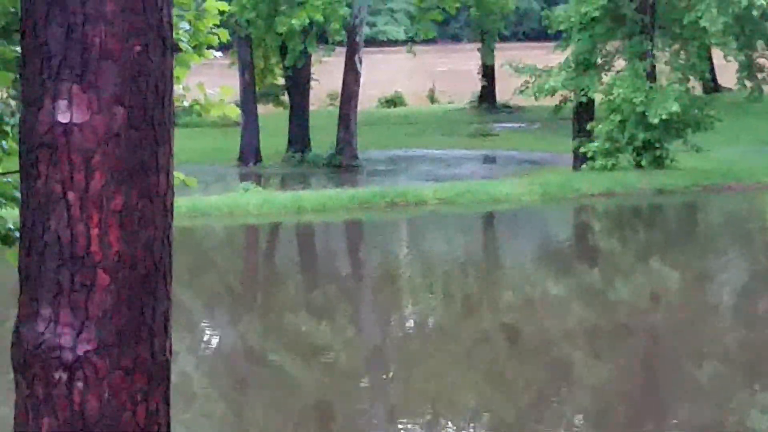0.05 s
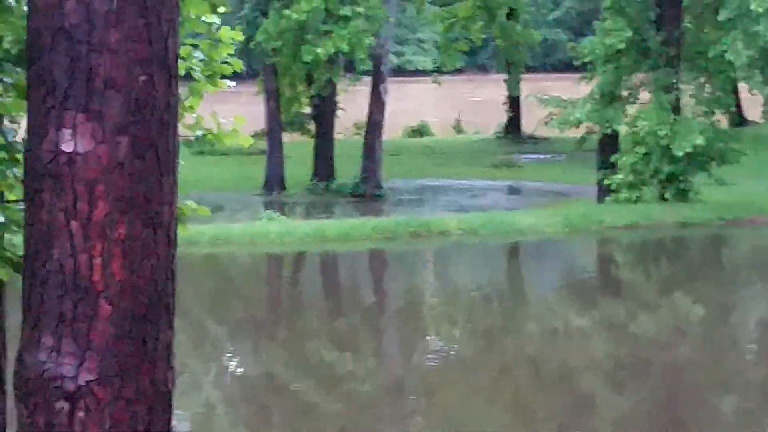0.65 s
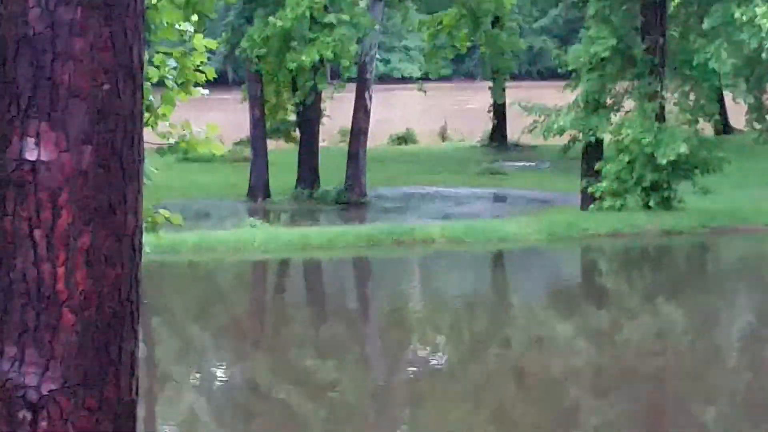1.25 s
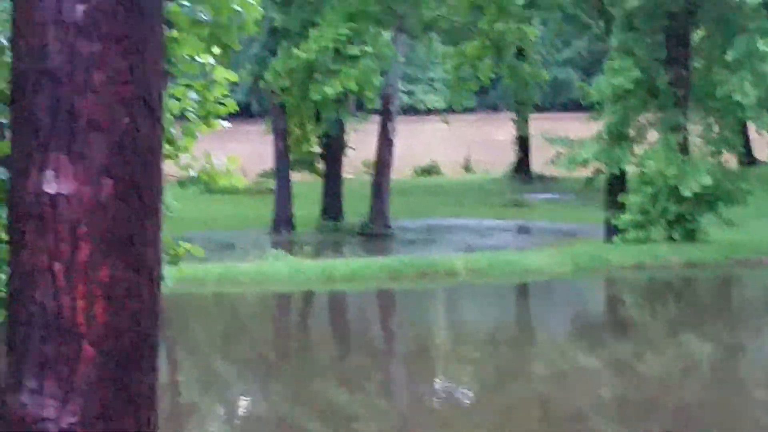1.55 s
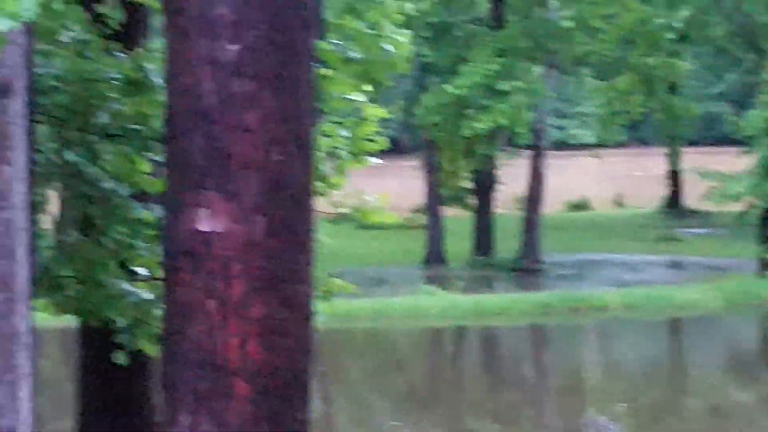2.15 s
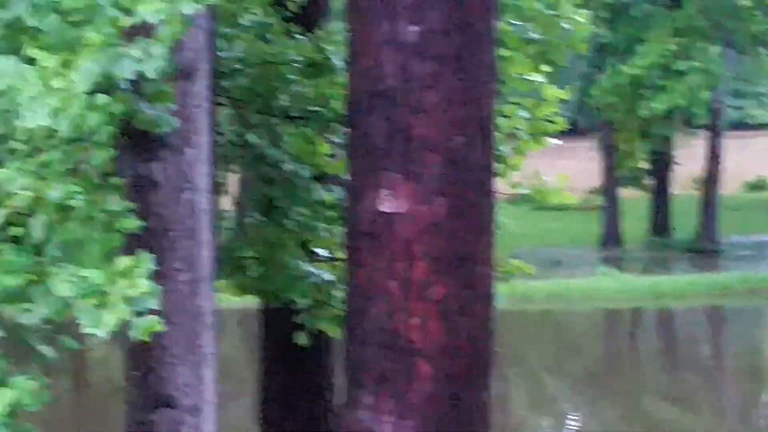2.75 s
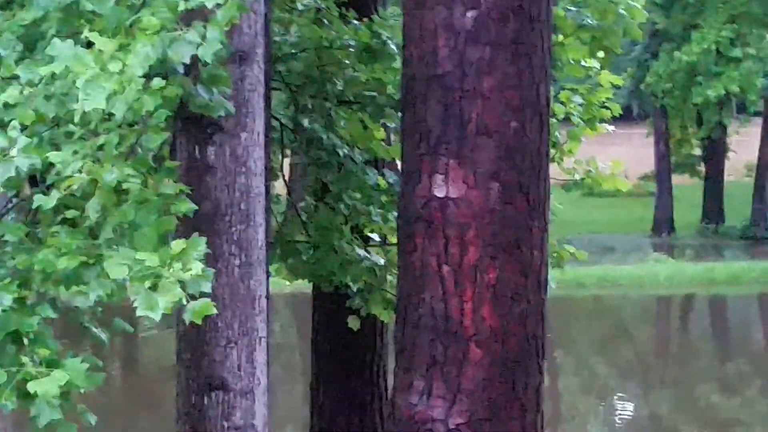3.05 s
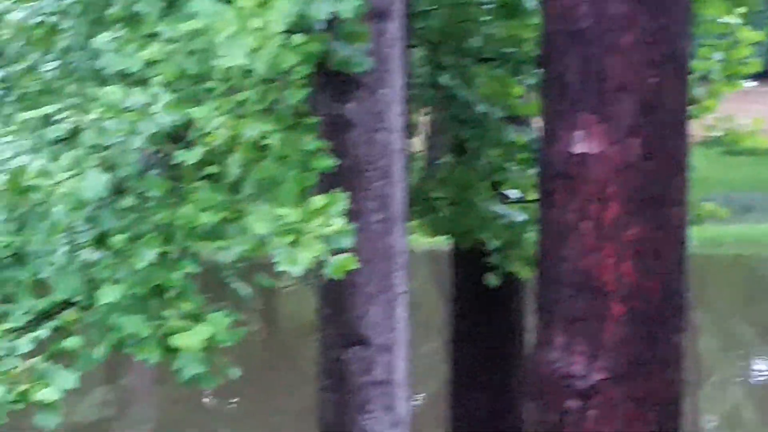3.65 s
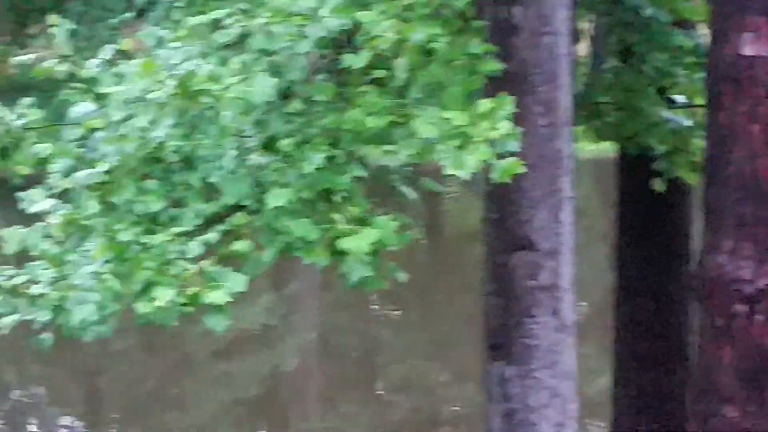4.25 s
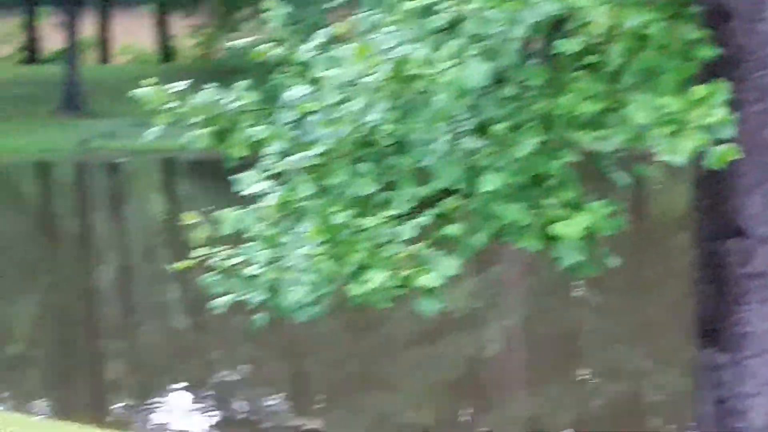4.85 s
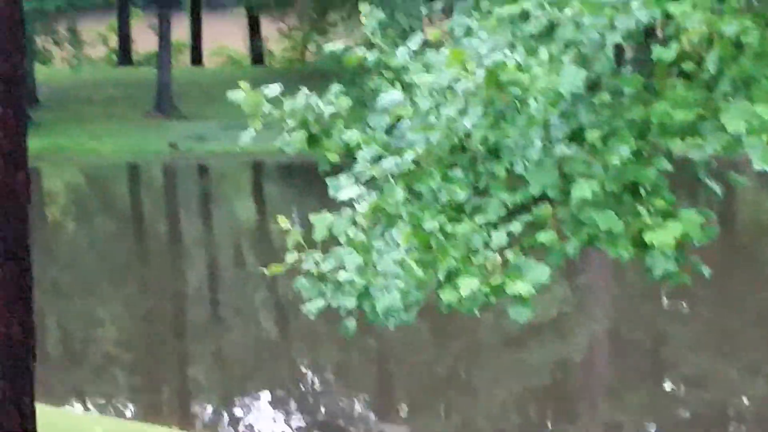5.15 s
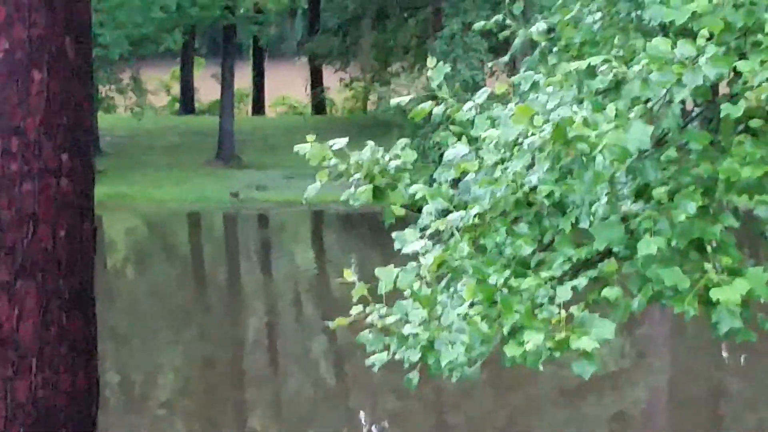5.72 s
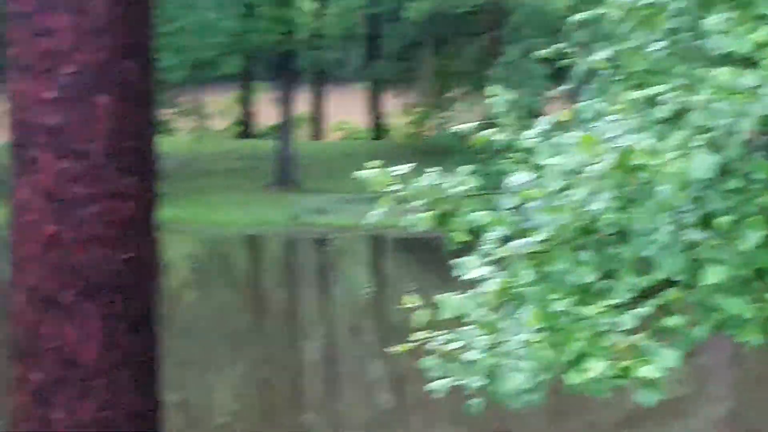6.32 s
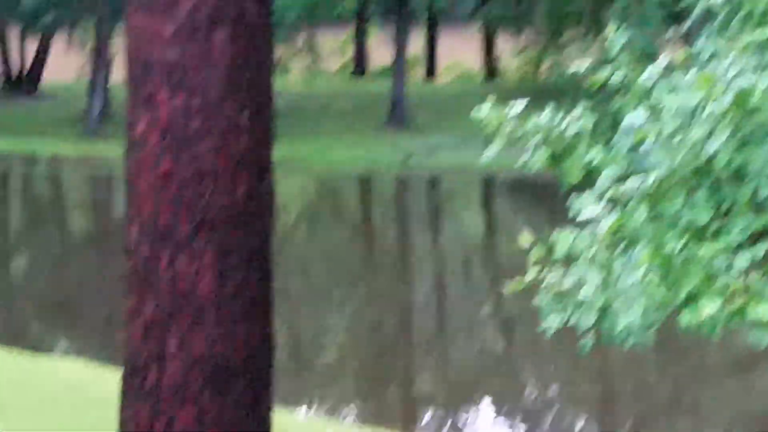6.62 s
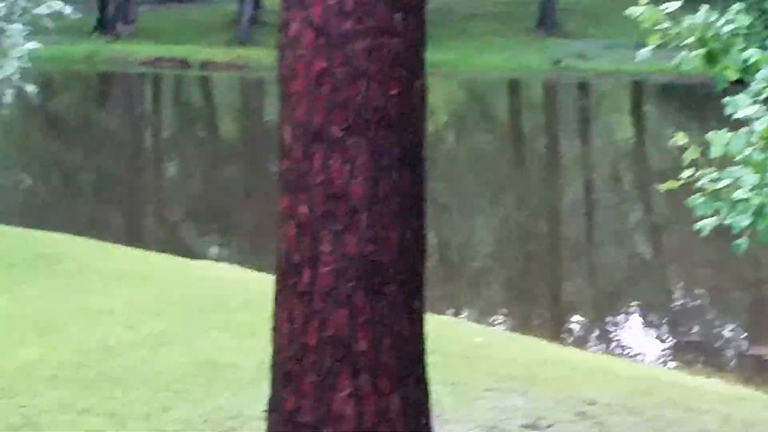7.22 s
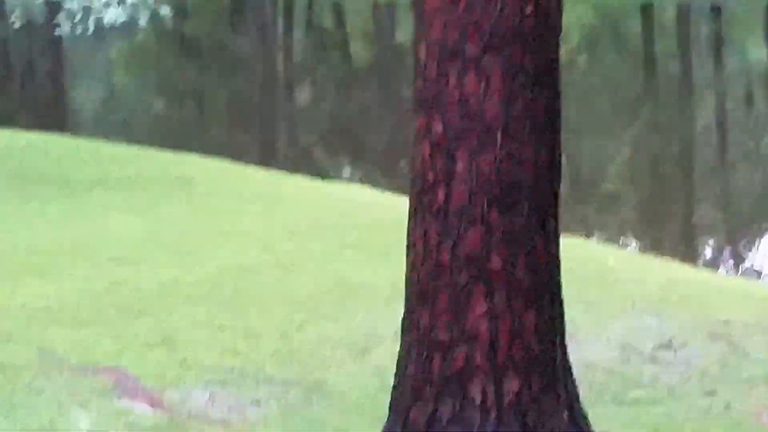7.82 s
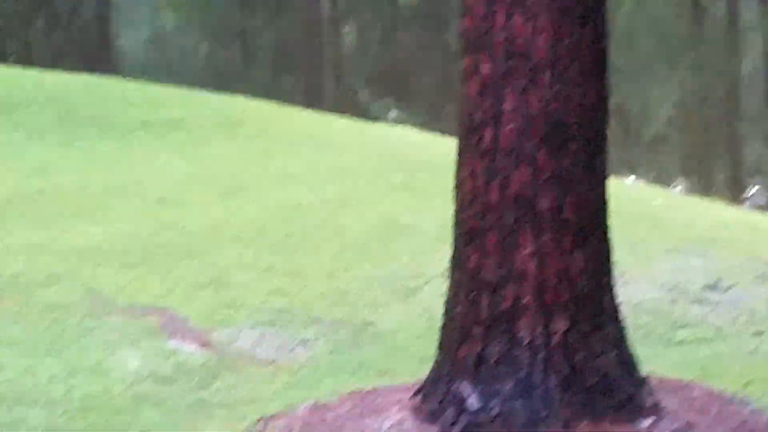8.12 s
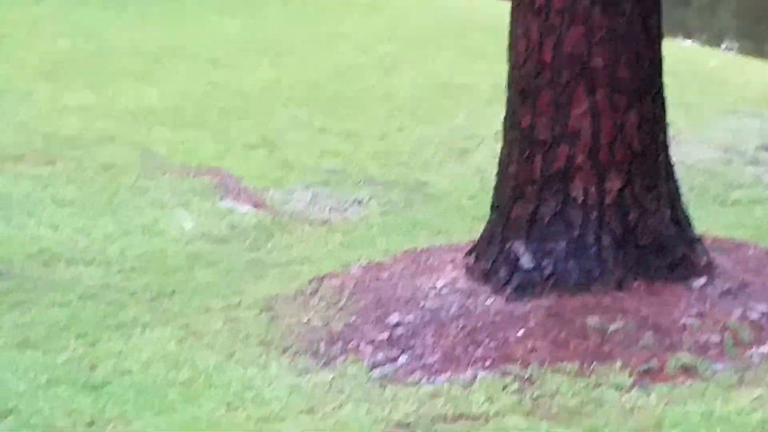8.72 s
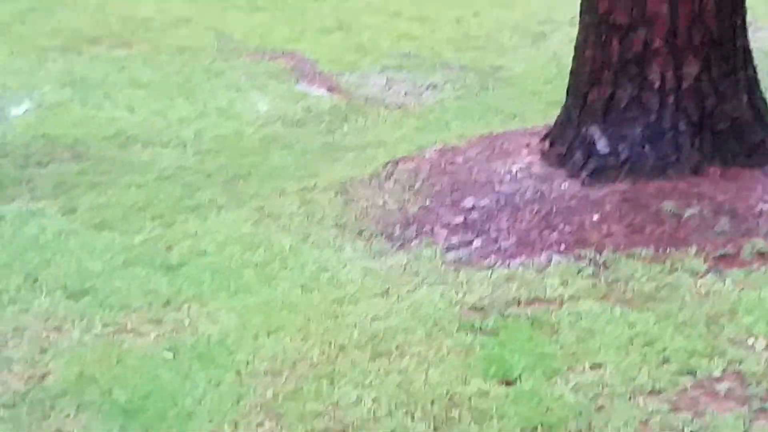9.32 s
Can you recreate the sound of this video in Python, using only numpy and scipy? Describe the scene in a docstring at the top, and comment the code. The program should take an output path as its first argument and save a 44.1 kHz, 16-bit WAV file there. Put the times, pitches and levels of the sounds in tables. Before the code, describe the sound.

A far bird sings a run of buzzy, echoing warbles in wet woods beside a pond. Small birds nearer by give thin, high calls while others whistle in the distance. Drops tick lightly on leaves, with a few faint hollow plops on the water. Late on, one drop hits the right side of the microphone with a short, loud thump. Distant traffic rumbles steadily underneath.

```python
"""First comes a run of buzzy warbles from a far bird, blurred by wet woods beside a flooded pond.
Small birds nearby give thin calls that rise and fall, and others whistle far off. The rain is over,
but water still ticks on the leaves and plops across the pond, and one drop thumps onto the right
microphone's port (its small opening). Under it all lie the drone of distant traffic and a faint hiss."""
import sys
import numpy as np
from scipy import signal
from scipy.fft import rfft, irfft
from scipy.io import wavfile

SR = 44100
rng = np.random.default_rng(int(sys.argv[2]) if len(sys.argv) > 2 else 0)


def wav_out(sig):
    """Save sig, one row per channel (or a flat mono array), as 16-bit PCM at SR to the path in sys.argv[1]."""
    wavfile.write(sys.argv[1], SR, np.round(np.clip(np.atleast_2d(sig).T, -1, 1) * 32767).astype(np.int16))


N = 422037

# Levels in the tables are relative: later steps turn them up or down.
# thin arched calls of the near birds: t/s, top f/Hz, fall/Hz, level/dB
CALLS = [(.92, 8360, 1910, -65), (1.316, 7550, 1000, -70), (1.85, 8070, 1100, -63.5),
         (2.478, 7530, 1100, -68), (3.833, 8320, 704, -67), (4.8, 8200, 500, -74.5),
         (5.22, 7850, 1090, -69.5), (6.245, 8310, 1650, -67.5), (7.375, 8100, 1120, -70),
         (7.558, 7620, 400, -75), (8.554, 8020, 900, -70), (8.83, 8020, 450, -75.5),
         (9.247, 7640, 600, -70)]
CALL_S, CALL_FALL_HZ_PER_S = .11, 35000   # a call lasts longer the further it falls
# far songs: t/s, number of notes, first f/Hz, step per note/Hz, note length/s, wobble/Hz,
# level/dB, growth per note/dB
SONGS = [(1.02, 3, 2624, -42, 0.274, 34, -69.5, 1), (2.868, 3, 3060, 10, 0.12, 36, -64, -0.3),
         (6.308, 4, 2552, -22, 0.29, 58, -68, -.4), (6.385, 3, 3036, 20, .13, 30, -66, 2.4),
         (7.719, 4, 3110, -17.5, .19, 24, -65.5, 2.0), (8.079, 3, 2460, 10, .085, 65, -66.5, 0)]
NOTE_BEAT_S = .255   # all songs keep this beat
# lone, very high whistles: t/s, f/Hz, level/dB
THIN_WHISTLES = [(3.476, 8730, -80), (3.6, 7160, -73.5), (4.15, 6520, -78), (4.726, 10980, -83),
                 (4.86, 6840, -81), (4.95, 10630, -78.5), (6.75, 8840, -81.5), (7.0, 8720, -79)]
THIN_S, THIN_SAG_HZ, THIN_WOBBLE_HZ = 0.154, 129, 110
# buzzy warbles, a run and then two alone: t/s, length/s, top f/Hz, depth of the swing/Hz, level/dB
WARBLES = [(-.25, 0.29, 6030, 1750, -58.5), (0.019, 0.29, 6120, 1800, -59.5),
           (0.319, .3, 6030, 1750, -61.5), (0.619, 0.24, 6200, 1900, -60.5), (0.881, .15, 5050, 850, -60),
           (1.06, .36, 5025, 850, -61), (2.999, 0.36, 4850, 420, -63.5), (7.075, 0.4, 4900, 461, -64.5)]
WARBLE_RISE_HZ, WARBLE_FALL_HZ, WARBLE_WIDENS_HZ, WARBLE_FADE_DB = 450, 400, 750, 7
# heavier drops striking leaves: t/s, level/dB, f/Hz
DRIPS = [(1.83, -51, 10500), (2.6983, -48, 10800), (2.9507, -47, 11100), (3.7772, -47.5, 10700),
         (3.994, -46.5, 8130), (4.4807, -50.5, 8200), (5.0733, -45, 10400), (5.1801, -43, 8240),
         (5.4912, -47.5, 8050), (5.657, -45, 8590), (5.678, -38.5, 10800), (5.876, -45, 8280),
         (5.955, -48, 10900), (5.9928, -48, 8580), (6.544, -48.5, 10700), (6.7126, -47.5, 10900),
         (7.3067, -47.5, 11100), (7.4282, -34.5, 10600), (7.5333, -47, 10800), (8.6482, -48, 8410),
         (8.9526, -47, 10800)]
LEFT_TICK_HZ, RIGHT_TICK_HZ = 8600, 10800   # lighter drops tick near the pitch of their side's port
# hollow plops from across the water: t/s, level/dB
PLOPS = [(1.372, -52.5), (4.085, -65), (5.212, -57), (8.145, -58)]
# the bands a plop rings in: f/Hz, width/octaves, level/dB
PLOP_RINGS = [(1186, 0.23, -1), (1780, .27, -12.5)]
# drops bursting into bright spray: t/s, level/dB
SPRAYS = [(5.672, -72), (5.895, -72), (7.43, -75), (8.57, -71)]
# soft rustles of wet leaves: t/s, f/Hz, width/octaves, time to peak/s, level/dB
RUSTLES = [(.67, 2100, 0.45, .012, -71), (3.728, 3000, .28, 0.0074, -66), (4.47, 4500, 2.3, 0.02, -72.5),
           (9.525, 2800, 0.69, .03, -69.5)]
# a branch sheds its water: t/s, level/dB
FLURRIES = [(-.1, -74), (.72, -74.5), (1.78, -73), (3.1, -73), (3.75, -71.5), (4.88, -74), (5.5, -71.5),
            (6.65, -74), (7.42, -72), (8.6, -70.5)]
# the roar of distant traffic, from low to high: f/Hz, level/dB
ROAR = [(15, -22), (33, -9.5), (48, -1), (100, -4.5), (150, -2), (210, -4.5), (330, -7.5), (500, -9),
        (680, -13.5), (900, -15), (1250, -25), (1900, -35.5), (3300, -46), (6000, -76)]
# engine drones within the roar: f/Hz, half-width/Hz, level/dB
DRONES = [(78.5, 14.2, -46), (119, 9.3, -45), (260.6, 22, -56.5), (367, 7.1, -64), (472, 26, -61.5),
          (867, 124, -60)]
# slow swell of the two deepest drones: t/s, lower drone's level/dB, upper drone's level/dB
DRONE_SWELLS = [(0, 3, -0.5), (1.5, 0, -0.5), (2.7, 3, 1.5), (4.2, -1, 2), (5.5, -1, -3.5), (6.7, 0.5, -1),
                (8.3, 4.5, -3), (9.57, 0.5, -4)]
# the hush of the woods, from low to high: f/Hz, level/dB
HUSH = [(1000, -5), (2500, 8), (3500, 4.5), (5000, 3.5), (6000, -2.5), (8000, -11.5), (11000, -8),
        (16000, -3.5)]
# how alike the background is on left and right: f/Hz, likeness (1 = the same)
LIKENESS = [(60, 0.98), (130, 0.99), (290, 0.97), (640, 0.91), (1410, -0.17), (3100, -0.1), (6820, 0.01),
            (15000, 0.0)]
# bands that each microphone port lifts or lowers: f/Hz, width/Hz, gain/dB
LEFT_PORT = [(4900, 980, 0), (6060, 1300, -11), (8354, 1620, 18), (11300, 4400, 6)]
RIGHT_PORT = [(4900, 1500, 1.5), (5900, 1500, -6), (7960, 800, -0.5), (9550, 1100, -7), (10880, 2220, 19.5)]


def near_birds(rise=0.088, crest=.25, fade_db=18):
    """Each call climbs quickly to its top, where it is loudest, then curves down and fades."""
    sung, in_sight = np.zeros((2, N))
    for s, top_hz, fall_hz, db in CALLS:
        count = int((CALL_S + fall_hz / CALL_FALL_HZ_PER_S) * SR)
        before, after = arch(count, crest)
        hz = top_hz * (1 - rise * before ** 2) - fall_hz * after ** 1.8
        soft_edges = signal.windows.tukey(count, .15)
        loudness = from_db(db - fade_db * (before ** 2 + 0.4 * after ** 2)) * soft_edges
        # fainter birds sit deeper in the leaves, which block their straight path
        hidden = np.interp(db, [-78, -62], [1, 0])
        call = bird_tone(hz, loudness, waver=0.0055 + .007 * hidden)
        add(sung, s, call)
        add(in_sight, s, call * from_db(-3.0 - 12 * hidden))
    echoes = woods(sung, direct_db=-34, early_db=-5.5, late_db=-7.5, early_s=0.43, late_s=1.4)
    return (in_sight + echoes) * pan(2.6)


def warblers(swings_per_s=31, high_db=2.5, uneven=.22, crest=.25):
    """Each warble climbs, then sinks and fades, dipping fast in pitch; mostly its echoes arrive."""
    lead = SR // 2   # the song is already under way
    out = np.zeros(lead + N)
    for s, length, top_hz, depth_hz, db in WARBLES:
        count = int(length * SR)
        before, after = arch(count, crest)
        turns = np.cumsum(swings_per_s * (1 + .3 * drift(30.08, count))) / SR
        dip = np.abs(2 * (turns % 1) - 1) * (1 + uneven * drift(301.2, count))
        arch_hz = top_hz - WARBLE_RISE_HZ * before ** 2 - WARBLE_FALL_HZ * after ** 2
        hz = arch_hz - (depth_hz + WARBLE_WIDENS_HZ * after) * dip
        level_db = db + high_db * (1 - 2 * dip) - WARBLE_FADE_DB * after
        loudness = from_db(level_db) * signal.windows.tukey(count, .4)
        add(out, s + lead / SR, bird_tone(hz, loudness, waver=.009))
    heard = woods(out, direct_db=-7.5, early_db=-5.5, late_db=-0.5, early_s=0.43, late_s=2.1)
    return heard[:, lead:] * pan(-2)


def whistlers():
    """Far birds whistle songs on an even beat, and lone high notes; the trees draw them out."""
    out = np.zeros(N)
    for s, notes, first_hz, step_hz, length, wobble_hz, db, growth_db in SONGS:
        for k in range(round(notes)):
            note = whistle(length, first_hz + k * step_hz, step_hz, wobble_hz, db + k * growth_db)
            add(out, s + k * NOTE_BEAT_S, note)
    for s, hz, db in THIN_WHISTLES:
        add(out, s, whistle(THIN_S, hz, -THIN_SAG_HZ, THIN_WOBBLE_HZ, db))
    return woods(out, direct_db=-6.0, early_db=-7.5, late_db=-2.0, early_s=0.34, late_s=1.55) * pan(-3.5)


def whistle(length, pitch_hz, glide_hz, wobble_hz, db, hoarse_hz=170, hoarse_db=-9.5):
    """One nearly level note; a quieter, shakier tone on top makes it hoarse."""
    hz = pitch_hz + glide_hz * np.linspace(-.5, .5, int(length * SR))
    loudness = from_db(db) * signal.windows.tukey(len(hz), .6)
    clear = bird_tone(hz, loudness, wobble_hz / pitch_hz)
    return clear + from_db(hoarse_db) * bird_tone(hz, loudness, hoarse_hz / pitch_hz)


def bird_tone(hz, loudness, waver):
    """A bird's voice: a pure tone on a slightly unsteady pitch."""
    pitch = hz * (1 + waver * drift(219.9, len(hz)))
    return np.sqrt(2) * loudness * np.sin(2 * np.pi * np.cumsum(pitch) / SR)


def drips(tick_db=-4.0, tick_s=0.00044, splash_db=-21, splash_s=0.013, side_db=5):
    """A drop snaps on a leaf and throws a short splash."""
    out, t = np.zeros((2, N)), np.arange(SR // 16) / SR
    for s, db, hz in list(DRIPS) + light_drips():
        snap, splash = rng.standard_normal((2, len(t)))
        hit = snap * np.exp(-t / tick_s) + from_db(splash_db) * splash * np.exp(-t / splash_s)
        hit = butter(hit, [hz * 0.79, hz * 1.36], "band")
        # drops tick lower on the left and higher on the right, ringing at each microphone port's pitch
        sides = pan(np.interp(hz, [8200, 10800], [side_db, -side_db]))
        for track, gain in zip(out, sides):
            add(track, s, gain * from_db(db + tick_db) * hit / np.abs(hit).max())
    return woods(out, direct_db=0, early_db=-11, late_db=-3.5, early_s=0.44, late_s=1.0)


def light_drips(count=20, db=-53.5, spread_db=0.5, left_share=.2):
    """Small drops at random moments, to the left or right: rows like those of DRIPS."""
    rows = []
    for when, size, side in rng.random((count, 3)):
        hz = LEFT_TICK_HZ if side < left_share else RIGHT_TICK_HZ
        rows.append((when * N / SR, db + spread_db * (2 * size - 1), hz))
    return rows


def drop_on_port(at_s=7.467, peak_db=-6.0, leak_s=0.0041, soft_hz=1600, low_hz=68):
    """A drop seals the right port: the pressure jumps, leaks away and swings below normal."""
    out, t = np.zeros((2, N)), np.arange(SR // 10) / SR
    push = butter(np.exp(-t / leak_s), soft_hz, "low", order=3)
    push = butter(push, low_hz, "high")
    add(out[1], at_s, from_db(peak_db) * push / push.max())
    return out


def splashes(knock_s=0.00111, knock_db=-14.5):
    """Hollow plops, bright sprays and soft rustles; the heaviest drop also knocks its leaf."""
    out = np.zeros(N)
    for s, db in PLOPS:
        for hz, octaves, ring_db in PLOP_RINGS:
            add(out, s, burst(hz, octaves, swell_s=0.012, db=db + ring_db))
    for s, db in SPRAYS:
        add(out, s, burst(hz=12900, octaves=1, swell_s=0.015, db=db))
    for s, hz, octaves, swell_s, db in RUSTLES:
        add(out, s, burst(hz, octaves, swell_s, db))
    s, db, _ = max(DRIPS, key=lambda drip: drip[1])
    add(out, s - knock_s, burst(hz=4600, octaves=0.65, swell_s=knock_s, db=db + knock_db))
    return woods(out, direct_db=0.5, early_db=-4.5, late_db=-5.5, early_s=0.23, late_s=0.97) * pan(-5.5)


def patter(per_s=1200, spread_db=5.0, steady_db=-79.5, gain_db=-5):
    """Countless tiny droplets all around, growing louder when a branch sheds its water."""
    t = np.arange(N) / SR
    flurries = sum((from_db(db) * swell(t - s, peak_s=0.1)) ** 2 for s, db in FLURRIES)
    level = from_db(gain_db) * np.sqrt(from_db(steady_db) ** 2 + flurries)
    sizes = from_db(spread_db * np.minimum(rng.exponential(1, (2, N)), 5))
    signs = rng.choice([-1, 1], (2, N))
    ticks = sizes * signs * (rng.random((2, N)) < per_s / SR)
    blur = 0.82 * rng.standard_normal((2, N))
    return level * unit_power(butter(unit_power(ticks) + blur, [7000, 15500], "band", order=1))


def traffic(roar_db=-41.5, swell_db=0.5):
    """A far roar, dulled by distance, with a few engine drones standing out of it."""
    roar = from_db(roar_db) * open_air(lambda hz: from_db(at_hz(ROAR, hz))) * pan(-3.5)
    drones = [from_db(db) * open_air(lambda hz: 1 / (1 + ((hz - centre) / width) ** 2))
              for centre, width, db in DRONES]
    s, *swells = np.transpose(DRONE_SWELLS)
    for k, level in enumerate(swells):
        drones[k] *= from_db(np.interp(np.arange(N) / SR, s, level))
    return (roar + sum(drones) * pan(-2.1)) * from_db(swell_db * drift(4, N))


def hush(level_db=-73):
    """Smooth, faint hiss of far leaves and far birds."""
    return from_db(level_db) * open_air(lambda hz: from_db(at_hz(HUSH, hz))) * pan(-1.3)


def open_air(gain, lag_s=0.00025):
    """Stereo noise shaped by gain(hz), alike in the bass and reaching the left side later."""
    hz = np.fft.rfftfreq(N, 1 / SR)
    alike = np.clip(at_hz(LIKENESS, hz), 0, 1)
    mid, side = rfft(rng.standard_normal((2, N)))
    pair = gain(hz) * (np.sqrt(1 + alike) * mid + np.sqrt(1 - alike) * side * [[1], [-1]])
    pair[0] *= np.exp(-2j * np.pi * hz * lag_s)
    return unit_power(irfft(pair, N))


def woods(x, direct_db, early_db, late_db, early_s, late_s):
    """The straight path, quick echoes off near trunks and leaves, and a long tail from the wood."""
    t = np.arange(2 * SR) / SR
    early, late = rng.standard_normal((2, 2, len(t))) * (1 - np.exp(-t / 0.0096))
    early = from_db(early_db) * unit_power(early * from_db(-60 * t / early_s))
    late = from_db(late_db) * unit_power(late * from_db(-60 * t / late_s))
    echoes = signal.fftconvolve(np.atleast_2d(x), (early + late) / np.sqrt(len(t)), axes=1)
    return from_db(direct_db) * x + echoes[:, :x.shape[-1]]


def port(x, bands):
    """The small hollow in front of a microphone lifts some of the treble and lowers some."""
    for hz, width_hz, db in bands:
        middle = -2 * np.cos(2 * np.pi * hz / SR)
        half, g = np.tan(np.pi * width_hz / SR), from_db(db / 2)
        x = signal.lfilter([1 + half * g, middle, 1 - half * g], [1 + half / g, middle, 1 - half / g], x)
    return x


def burst(hz, octaves, swell_s, db):
    """A short puff of noise in one band."""
    t = np.arange(SR // 4) / SR
    band = butter(rng.standard_normal(len(t)), hz * 2 ** (octaves * np.array([-.5, .5])), "band")
    return from_db(db) * unit_power(band) * swell(t, swell_s)


def swell(t, peak_s):
    """Rise to 1 at peak_s, then die away."""
    u = np.maximum(t, 0) / peak_s
    return u * np.exp(1 - u)


def arch(count, crest):
    """Distance from the top of a note: 1 to 0 before it, 0 to 1 after it."""
    u = np.linspace(0, 1, count)
    return np.clip(1 - u / crest, 0, 1), np.clip((u - crest) / (1 - crest), 0, 1)


def drift(per_s, count):
    """A random wander around zero, roughly 1 either way."""
    at = np.arange(count) * per_s / SR
    return np.interp(at, np.arange(4096), rng.standard_normal(4096))


def from_db(db):
    """Turn decibels into a gain."""
    return 10 ** (np.asarray(db) / 20)


def unit_power(x):
    """Scale to an average power of 1."""
    return x / np.sqrt(np.mean(x ** 2) + 1e-20)


def pan(left_db):
    """Two gains that make the left side left_db louder than the right."""
    return from_db(np.array([[left_db], [-left_db]]) / 2)


def at_hz(points, hz):
    """Read between a table's rows, giving each octave equal room."""
    f, value = np.transpose(points)
    return np.interp(np.log(hz + 1), np.log(f), value)


def butter(x, hz, kind, order=2):
    """A filter that keeps the lows, the highs or one band."""
    sections = signal.butter(order, np.clip(hz, 10, .48 * SR), kind, fs=SR, output="sos")
    return signal.sosfilt(sections, x + 1e-18)


def add(track, s, sound):
    """Mix a sound into a track at s seconds."""
    start = max(round(s * SR), 0)
    track[start:start + len(sound)] += sound[:len(track) - start]


def scene():
    """Birds and dripping leaves over the far traffic."""
    birds = near_birds() + whistlers() + warblers()
    water = drips() + patter() + splashes() + drop_on_port()
    return birds + water + traffic() + hush()


def record(dry, cutoff_hz=15800):
    """Each port colours its own side, and the highest treble is cut off."""
    heard = np.array([port(dry[0], LEFT_PORT), port(dry[1], RIGHT_PORT)])
    return signal.sosfilt(signal.ellip(12, .1, 80, cutoff_hz, fs=SR, output="sos"), heard)


dry = scene()
out = record(dry)
wav_out(out)
```